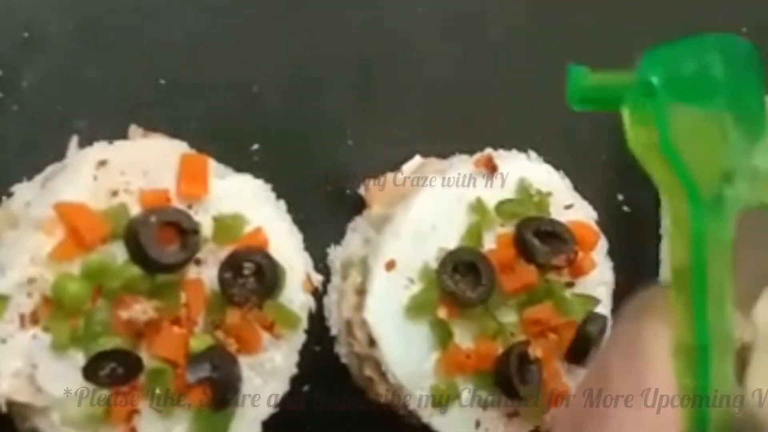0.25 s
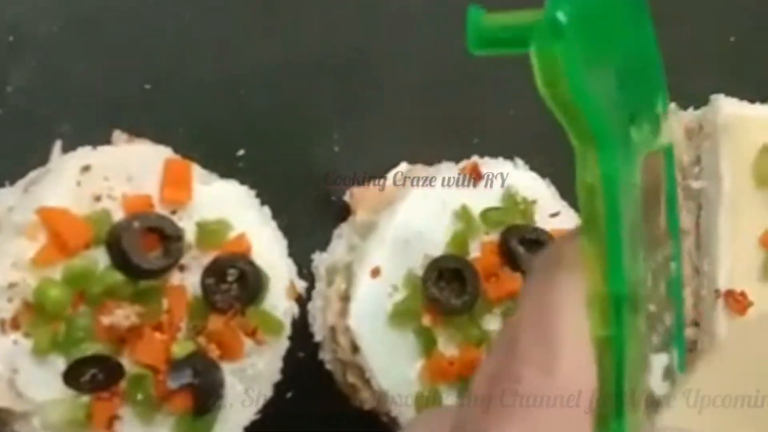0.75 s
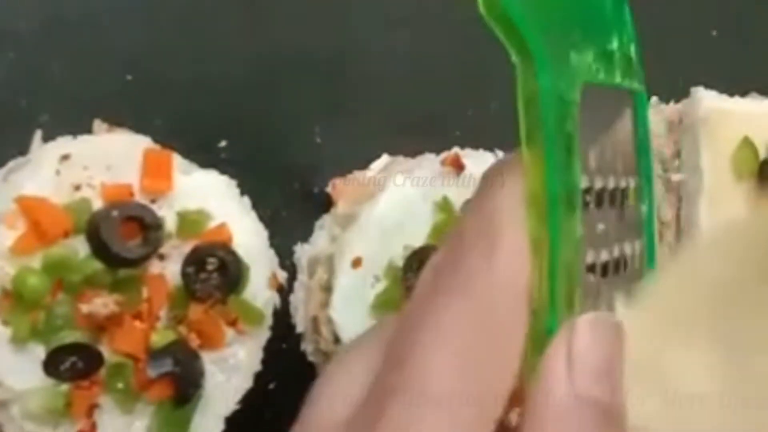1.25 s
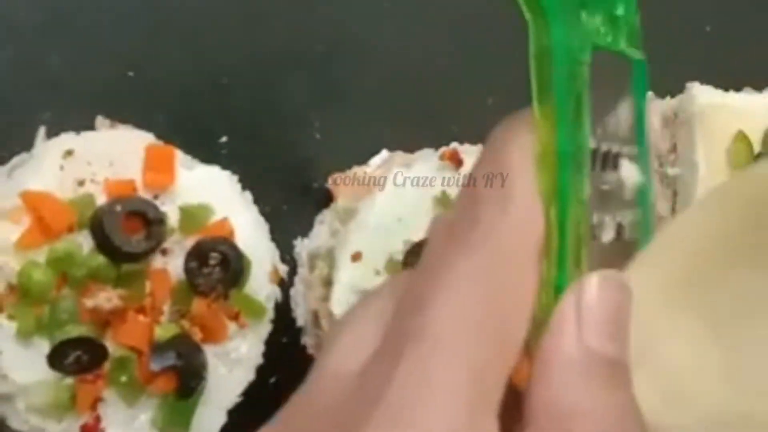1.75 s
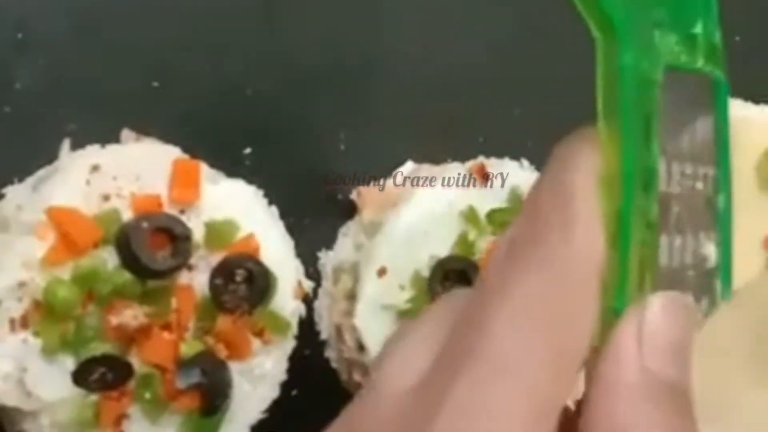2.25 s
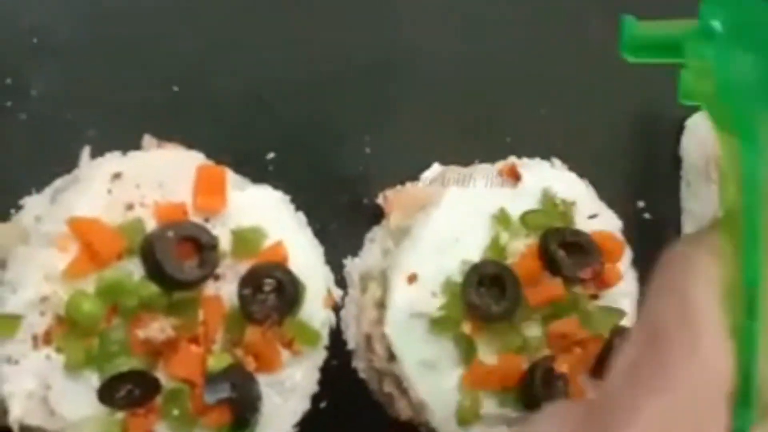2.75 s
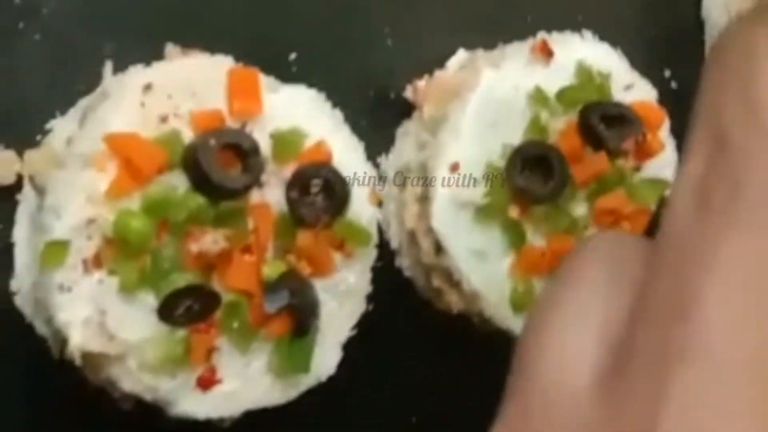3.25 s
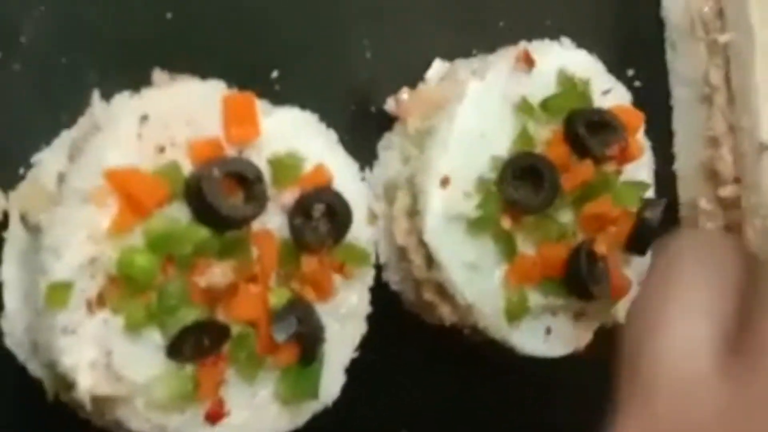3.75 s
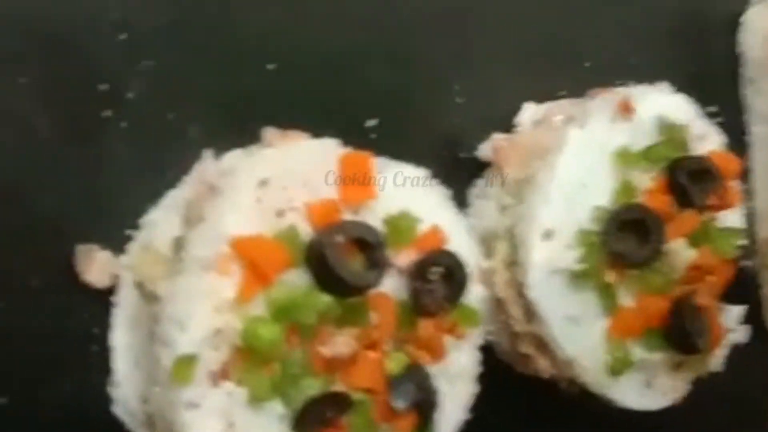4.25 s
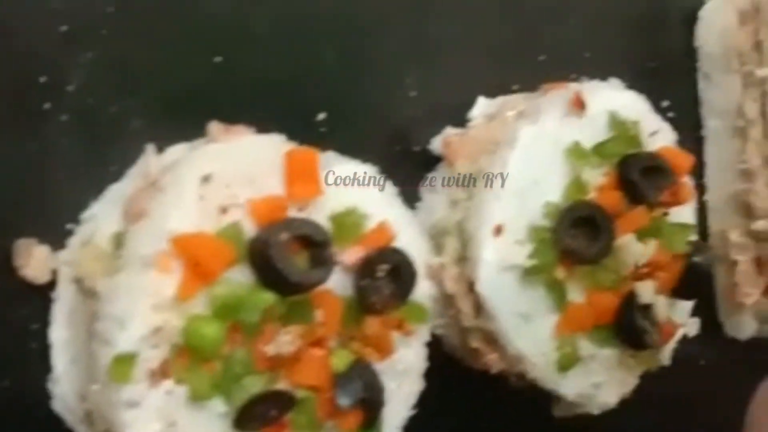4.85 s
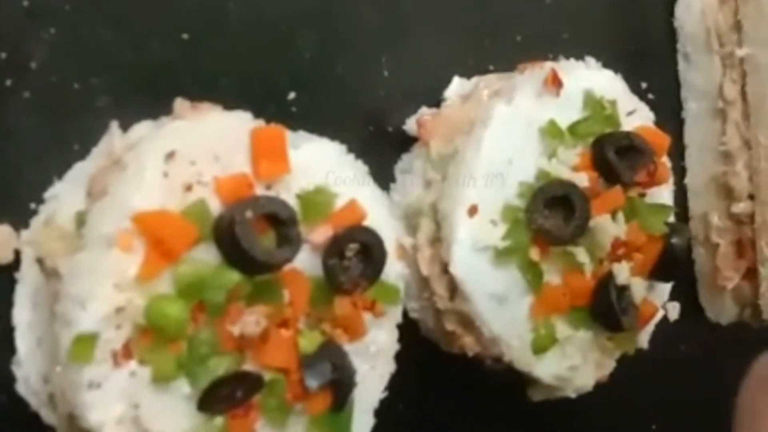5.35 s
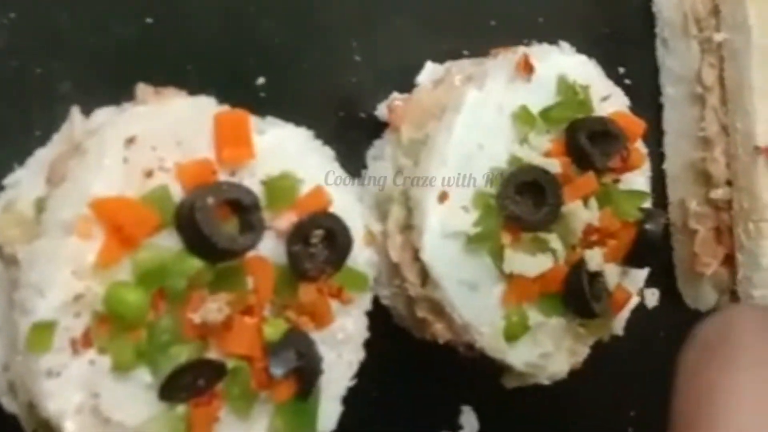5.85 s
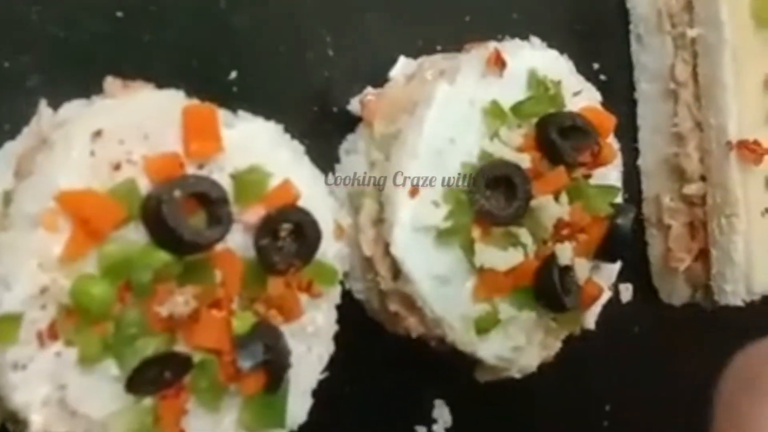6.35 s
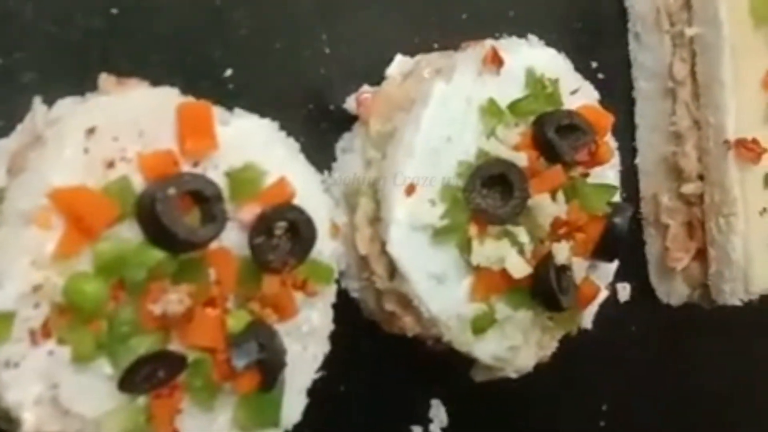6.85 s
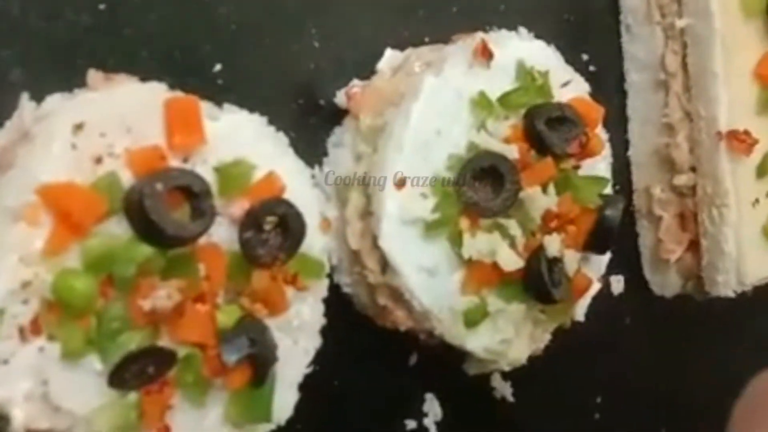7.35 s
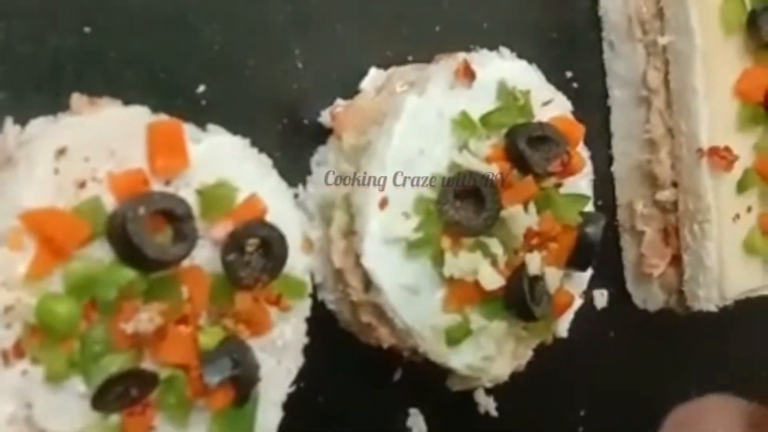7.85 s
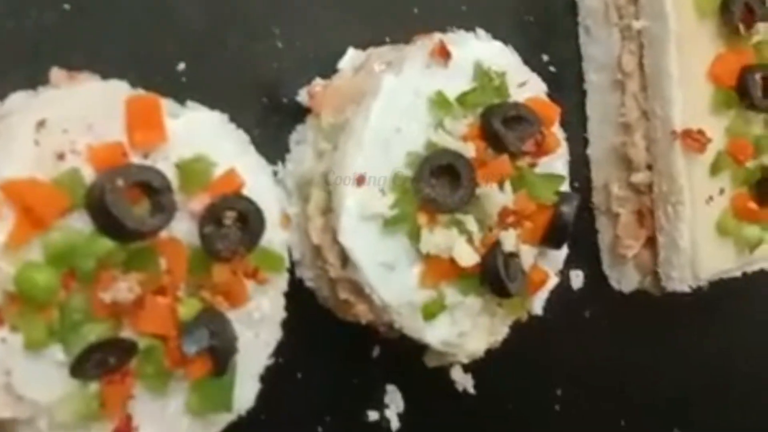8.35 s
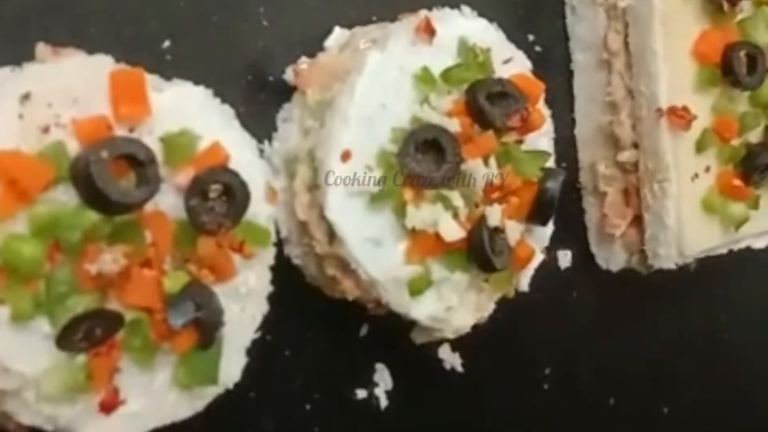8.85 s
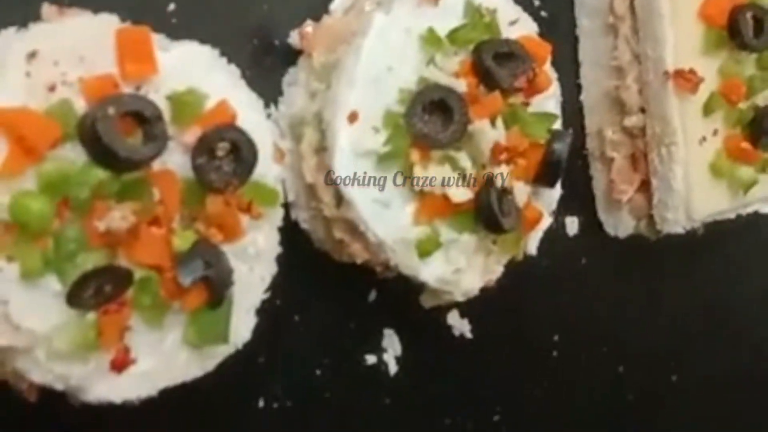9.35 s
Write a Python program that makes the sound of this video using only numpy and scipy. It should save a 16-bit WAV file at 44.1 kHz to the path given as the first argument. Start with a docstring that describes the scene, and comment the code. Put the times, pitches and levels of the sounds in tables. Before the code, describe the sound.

Cheese rasps in short uneven strokes over a plastic-framed hand grater, with sharp clacks and ticks, then stiff wrapping snaps and crackles loudly.

```python
"""In a kitchen, close to the microphone, a block of cheese is pushed in short strokes over a hand-held grater.
The teeth of its steel blade rasp in random grains; where the block catches and slips, gritty pushes ring the
modes of the plastic frame, which clacks, and the room answers briefly with decaying noise. At the end stiff
plastic, probably the cheese wrapper, snaps and crackles. Hands bump softly; two wavering low tones drone
faintly at first."""
import sys
import numpy as np
from scipy import signal
from scipy.fft import rfft, irfft, next_fast_len
from scipy.io import wavfile
from scipy.ndimage import uniform_filter1d, map_coordinates

SR = 44100
rng = np.random.default_rng(int(sys.argv[2]) if len(sys.argv) > 2 else 0)


def to_wav(sig):
    """Store sig (one row per channel, or 1-D mono) as 16-bit WAV at the path in sys.argv[1].

    Samples outside -1..1 are clipped; the rate is SR.
    """
    pcm = np.clip(np.atleast_2d(sig), -1, 1) * 32767
    pcm = np.round(pcm).astype(np.int16)
    wavfile.write(sys.argv[1], SR, pcm.T)  # frames by channels


N = 422919


def amp(db):
    """Decibels to gain."""
    return 10 ** (np.asarray(db) / 20)


def unit(x):
    """Scale to rms 1."""
    return x / np.sqrt(np.mean(x ** 2) + 1e-20)


def along(points, hz):
    """Read a curve of (Hz, value) points on a log frequency axis."""
    point_hz, value = np.transpose(points)
    return np.interp(np.log(hz + 1), np.log(point_hz + 1), value)


def wobble(rate):
    """A smooth random curve with rate knots a second."""
    knots = rng.standard_normal(int(N * rate / SR) + 4)
    return map_coordinates(knots, [np.arange(N) * rate / SR])


def filtered(x, response):
    """Multiply the spectrum of x by a response of frequency."""
    n = x.shape[-1]
    padded = next_fast_len(n + SR // 10)
    spectrum = rfft(x, padded) * response(np.fft.rfftfreq(padded, 1 / SR))
    return irfft(spectrum, padded)[..., :n]


def coloured(x, colour):
    """Filter x by a colour of (Hz, dB) points and scale it to rms 1."""
    return unit(filtered(x, lambda hz: amp(along(colour, hz))))


def add(out, s, x):
    """Mix x into out from time s."""
    start = max(round(s * SR), 0)
    part = out[..., start:start + x.shape[-1]]
    part += x[..., :part.shape[-1]]


def swells(rows, attack, release):
    """Gain of (start s, hold s, dB) gestures that rise before and fall after the hold at rates in dB per second."""
    t = np.arange(N) / SR
    gain = np.zeros(N)
    for start, hold, db in rows:
        below_db = attack * np.maximum(start - t, 0) + release * np.maximum(t - start - hold, 0)
        gain = np.maximum(gain, amp(db - np.minimum(below_db, 100)))
    return gain


def grains(rate, spread_db, life, hiss):
    """Tiny fractures of unequal size, each a short fizz of life seconds, over a smooth rub."""
    sizes = amp(spread_db * np.minimum(rng.standard_exponential(N), 3.5))
    pops = (rng.random(N) < rate / SR) * sizes
    fizz = signal.lfilter([1], [1, -np.exp(-1 / (life * SR))], pops)
    return (unit(fizz) + hiss) * rng.standard_normal(N)


def jolts(times, levels_db, modes, rise, fall, snap, creep_db=-26):
    """Gritty pushes creep, build up and let go (rise, fall in s), ringing resonances of (Hz, width Hz, dB)."""
    size, lead = 2048, 500
    level_span_s = .0075  # a level is the rms of a ring's whole energy spread over this time
    t = (np.arange(size) - lead) / SR
    creep = amp(creep_db) * np.exp(-np.abs(t) / .005) * np.clip(1 - t / t[0], 0, 1)
    envelope = np.exp(-np.where(t < 0, -t / rise, t / fall)) + creep
    push = rng.standard_normal((len(times), size)) * envelope
    push /= np.linalg.norm(push, axis=1, keepdims=True)
    push[:, lead] += snap  # the instant of letting go
    f = np.fft.rfftfreq(size, 1 / SR)
    # each push lands on another spot, so the modes answer at new strengths
    spot_db = 2.0 * rng.standard_normal((len(times), len(modes)))
    body = 0
    for k, (hz, width, db) in enumerate(modes):
        resonance = 1j * f * width / (hz * hz - f * f + 1j * f * width)
        body = body + (-1) ** k * amp(db + spot_db[:, k, None]) * resonance
    # a small part radiates little below its lowest mode and above its highest
    edges = [np.min(modes[0][0]) * .75, min(np.max(modes[-1][0]) * 1.25, SR / 2.1)]
    skirt = signal.freqz(*signal.butter(2, edges, "band", fs=SR), worN=f, fs=SR)[1]
    rings = irfft(rfft(push) * body * skirt)
    rings *= np.sqrt(level_span_s * SR) / np.linalg.norm(rings, axis=1, keepdims=True)
    out = np.zeros(N)
    for s, db, ring in zip(times, levels_db, rings):
        loudest = np.argmax(uniform_filter1d(ring ** 2, size=64))
        add(out, s - loudest / SR, amp(db) * ring)  # the loudest moment falls on the listed time
    return out


# Colour of the room's hush. Each row: frequency in Hz, relative level in dB.
HUSH_COLOUR = [(20, -15), (40, -13), (90, -5), (170, -6.5), (330, -11.5), (650, -20.5), (1200, -17.5),
               (1650, -18.5), (2100, -29.5), (3150, -21), (4150, -32.5), (6550, -26), (8600, -52.5),
               (15500, -51)]


def hush():
    """The quiet room is steady noise, strongest in the bass."""
    return amp(-78.0) * coloured(rng.standard_normal(N), HUSH_COLOUR)


# Tones of the faint drone. Each row: frequency in Hz, relative level in dB.
DRONE_TONES_HZ_DB = [(140, -1.5), (161, -9)]
# it swells to its loudest (s), holds (s) that level (dB), then falls fast
DRONE_PEAK_S, DRONE_HOLD_S, DRONE_DB = .24, 0.082, -54.5
DRONE_SWELL_DB_PER_S, DRONE_RELEASE_DB_PER_S = 29, 651


def drone():
    """Low sines with wavering phase swell faintly and soon stop."""
    t = np.arange(N) / SR
    tones = np.zeros(N)
    for hz, db in DRONE_TONES_HZ_DB:
        tones += amp(db) * np.sin(2 * np.pi * hz * t + 0.74 * wobble(26.4))
    swell = swells([(DRONE_PEAK_S, DRONE_HOLD_S, DRONE_DB)], DRONE_SWELL_DB_PER_S, DRONE_RELEASE_DB_PER_S)
    return swell * unit(tones)


# Shifts of the grip. Each row: start in seconds, hold in seconds, level in dB.
GRIP_SHIFTS = [(.18, 0.15, -64.5), (.7, 0.27, -74.5), (1.47, 0.035, -73), (2.04, 0.033, -72),
               (2.76, 0.18, -64), (2.99, 0.14, -66.5), (3.36, 0.13, -64.5), (3.5, 0.12, -61),
               (3.69, 0.041, -64.5), (3.9, .12, -70.5), (4.25, 0.035, -63), (4.44, 0.035, -67),
               (4.64, 0.034, -70), (4.8, 0.067, -71), (5.13, 0.024, -70.5), (5.37, .03, -74),
               (5.64, 0.036, -72), (6.0, .04, -73), (6.27, 0.037, -67.5), (6.65, 0.73, -77.5),
               (7.46, 0.07, -68.5), (8.28, 0.11, -73), (8.75, 0.22, -71.5), (9.03, 0.19, -63),
               (9.3, 0.23, -69.5)]
SHIFT_ATTACK_DB_PER_S, SHIFT_RELEASE_DB_PER_S = 261.5, 218
# Colour of the handling rumble. Each row: frequency in Hz, relative level in dB.
HANDS_COLOUR = [(20, -27), (40, -8.5), (62, 4), (80, -3), (100, 0), (130, -10.5), (172, -6.5), (230, -14.5),
                (400, -24), (700, -74.5)]


def hands():
    """A hand shifts its grip with a dull rumble, low noise that swells and falls."""
    gain = swells(GRIP_SHIFTS, SHIFT_ATTACK_DB_PER_S, SHIFT_RELEASE_DB_PER_S)
    return gain * coloured(rng.standard_normal(N), HANDS_COLOUR)


# The block slips on the teeth. Each row: time in seconds, pitch of the frame's clack in Hz, force in dB,
# sharpness in dB, knock over the force in dB; each part has a trim of its own below.
BLOCK_SLIPS = [(0.1767, 3030, -28.5, -7.5, -9.5), (0.2729, 3110, -36.5, -12, -13.5),
               (0.321, 3100, -51, 7.5, -9), (0.3552, 3180.0, -52, -17, -6),
               (0.4223, 2970, -46.5, -26, -28.5), (0.4347, 3140, -45.5, -10, -5.5),
               (0.4667, 3220.0, -40, 2.5, -14.5), (0.6552, 3120.0, -48, -4, -26.5),
               (0.6823, 3050, -30, -22, -3.5), (0.7935, 2760, -47, -34, -2), (0.933, 2840, -37, -26, -7.5),
               (1.1323, 2920, -52.5, -22, -34), (1.1576, 3120, -49, -28, -16.5),
               (1.186, 3040, -60, -17, -30), (1.3943, 3340, -57.5, 0, 3.5), (1.4379, 3270, -44.5, 1, -6),
               (1.59, 3150.0, -65, -22.5, -31), (1.689, 3180, -49.5, -5.5, -5.5),
               (1.9177, 3160, -50, 10, -16), (2.0123, 3322, -69, 15.5, -11), (2.1804, 3330, -69.5, 13, 2),
               (2.2153, 3270, -58.5, 8, 7), (2.2368, 3000, -53, 19, 1.5), (2.291, 3073, -41.5, -19, -28),
               (2.575, 2750, -58, -41.5, -16), (2.6588, 3165, -39.5, 4.5, -19),
               (2.7152, 3165, -38, -5, -3.5), (2.7557, 3050, -54, 2, -9), (2.9398, 3090, -45.5, -20, -5.5),
               (2.9832, 3150.0, -54, 3, -10), (2.9991, 3060.0, -38.5, -8, -2.5), (3.0568, 3000, -49, 0, 1),
               (3.1192, 3050, -42.5, -3, -7.5), (3.4013, 2990, -64.5, -20, -8),
               (3.5669, 3140, -33.5, -8, -23), (3.6389, 3160, -41, -21, -8),
               (3.7019, 3005, -43.5, -2.5, 2.5), (3.8715, 3360, -54.5, 5.5, 0),
               (4.0524, 3310, -35.5, -9, -5.5), (4.1, 3250, -33, -4, 0), (4.1308, 3325, -36.5, -5.5, -0.5),
               (4.2588, 3140, -36, -15.5, -6.5), (4.301, 3480, -40.5, -14, -3.5),
               (4.415, 3450.0, -60, 16, -8), (4.4603, 3350, -43.5, -5.5, -4),
               (4.5014, 3190.0, -43.5, 2.5, -12.5), (4.5552, 3400, -40.5, -3, -10.5),
               (4.7082, 3230, -50.5, 3, -23), (4.735, 3250, -54, 16, -28), (4.7686, 3340, -47, 2.5, -3),
               (4.97, 3040, -64, -32, -2), (5.0187, 3340, -46, -5.5, -4), (5.1042, 3354, -33, -16, -5),
               (5.3108, 3410.0, -51.5, -21, -8), (5.3853, 3400, -55, -3, -8), (5.3995, 3260, -48, -18, -10),
               (5.539, 3230.0, -49.5, -40, -11), (5.5548, 3356, -34.5, -7, -3),
               (5.5652, 3280, -40, -1, -21), (5.6324, 3230, -44, -8, -4.5), (5.8265, 2830, -44, -26, -12),
               (5.8727, 3267, -45.5, 2.5, -11), (6.0338, 3125, -67.5, -19, 4),
               (6.1681, 3240.0, -31.5, -5, -25.5), (6.2202, 3040, -39.5, -12.5, -31),
               (6.419, 2940, -54, -6, 1), (6.499, 2830, -55, 0.5, 3), (6.5269, 3240, -45.5, -12, -0.5),
               (6.652, 3150, -50, -40, -4), (6.6699, 3210, -47.5, -5, 5.5), (6.9128, 3315, -33.5, -15, -45),
               (6.9659, 3000, -40.5, -2.5, -18), (7.1014, 3260, -62, -24, 0),
               (7.1745, 3240.0, -48.5, 0, -2.5), (7.322, 3330, -38.5, -7.5, -8),
               (7.4609, 3140, -28, -9.5, -13), (7.7344, 2630.0, -57.5, -37, -28),
               (7.8754, 2970.0, -57, 1, -18), (8.0004, 3070, -51.5, -29.5, -30),
               (8.029, 3090, -38.5, -17, -31), (8.172, 3460, -54.5, 0, -35.5),
               (8.2642, 2964, -27, -19, -24.5), (8.6709, 2980, -23.5, -17.5, -17.5)]
# The frame's modes; where the block presses shifts them together.
# Each row: ratio to the clack pitch, width in Hz, relative level in dB.
FRAME_MODES = [(.78, 269.4, -16), (.89, 264, -5.5), (1.001, 265, 1.5), (1.092, 240, -3)]
# The other resonances that a slip rings: dull knock, steel blade, teeth, and its broad, ringless crack.
# Each row: frequency in Hz, width in Hz, relative level in dB.
KNOCK_MODES = [(1128, 75, -3), (1265.4, 78, 0), (1659, 150, -1), (2050, 120, -14.5)]
BLADE_MODES = [(4630, 570, -8.5), (5310, 690, -0.5), (6160, 800, -0.5), (6970, 650, 0.5), (7940, 1300, -10)]
TEETH_MODES = [(9820, 3400, -5), (12630, 830, 1), (14820, 920, -1.5)]
CRACK_BANDS = [(2030, 1800, -5.5), (4340, 2400, 0)]
# a sharper slip rings the high parts more: the teeth get all of the sharpness, the blade this share
BLADE_SHARE = 0.44


def slips():
    """The block jerks free with a broad crack: the frame clacks, the blade rings and the teeth tick."""
    s, clack_hz, force_db, sharp_db, knock_db = np.transpose(BLOCK_SLIPS)
    frame = [(ratio * clack_hz[:, None], width, db) for ratio, width, db in FRAME_MODES]
    blade_db = force_db + BLADE_SHARE * sharp_db
    clack = jolts(s, force_db, frame, rise=0.0005, fall=.001, snap=0.82, creep_db=-23.5)
    knock = jolts(s, force_db + knock_db, KNOCK_MODES, rise=0.001, fall=0.0012, snap=0.9, creep_db=-22)
    blade = jolts(s, blade_db, BLADE_MODES, rise=0.0005, fall=.0018, snap=0.6, creep_db=-23.5)
    teeth = jolts(s, force_db + sharp_db, TEETH_MODES, rise=0.00025, fall=0.0017, snap=0.3, creep_db=-21.5)
    crack = jolts(s, (force_db + blade_db) / 2, CRACK_BANDS, rise=0.0006, fall=0.0033, snap=0.46)
    return amp(0.5) * clack + amp(-0.67) * knock + blade + amp(1.0) * teeth + amp(-12) * crack


# The grater bumps against the hand and board. Each row: time in seconds, hollow note in Hz, level in dB.
SOFT_BUMPS = [(.177, 749, -57.5), (.681, 516.5, -54), (.682, 780, -52), (.933, 563, -44.5),
              (3.701, 906, -50), (4.099, 850, -51), (4.1, 559, -57), (4.13, 890, -54), (6.168, 790, -62.5),
              (6.22, 803, -61), (6.526, 605, -57), (6.913, 764, -66.5), (6.967, 739, -58),
              (8.811, 575, -50)]
# Hollow of the grater. Each row: frequency in Hz, width in Hz, relative level in dB.
HOLLOW_MODES = [(567, 25, 0), (860, 60, -1.5)]


def bumps():
    """Soft blows ring the hollow of the grater; every slip stirs it a little too."""
    s, _, force_db, _, knock_db = np.transpose(BLOCK_SLIPS)
    stirred = jolts(s, force_db + knock_db, HOLLOW_MODES, rise=0.0016, fall=0.0031, snap=1.0)
    s, note_hz, db = np.transpose(SOFT_BUMPS)
    blows = jolts(s, db, [(note_hz[:, None], 35, 0)], rise=0.0019, fall=0.002, snap=0.9)
    return amp(-23) * stirred + blows


# How long the kitchen rings. Each row: frequency in Hz, time to fall by 60 dB in seconds.
KITCHEN_T60 = [(300, 0.18), (1500, 0.21), (3000, 0.2567), (6000, 0.2514), (14000, 0.23)]
# Strength of its answer. Each row: frequency in Hz, level in dB.
KITCHEN_ECHO = [(300, 1), (1400, -7.5), (2200, -4), (3100, -10.5), (4200, -3.5), (6000, 0.5), (9500, -6.5),
                (14000, -5)]
# Left-right likeness of its answer. Each row: frequency in Hz, likeness from 0 to 1.
KITCHEN_ALIKE = [(3650, 1), (4200, .92), (5500, .84), (7000, .5), (10000, .1), (15000, .5)]


def kitchen_tail(build, bend):
    """One stereo answer of the room: noise builds up, lingers, then each frequency dies ever faster."""
    hz, t, noise = signal.stft(rng.standard_normal((2, SR // 2)), SR, nperseg=256)
    decay = amp(-60 * (t / along(KITCHEN_T60, hz)[:, None]) ** bend) * (1 - np.exp(-t / build))
    decay /= np.sqrt(np.mean(decay ** 2, axis=1, keepdims=True) * SR / 2)
    pair = signal.istft(noise * decay, SR, nperseg=256)[1]

    def mid_side_gains(f):
        # more side and less mid makes left and right less alike
        turn = np.arccos(np.clip(along(KITCHEN_ALIKE, f), 0, 1)) / 2
        return amp(along(KITCHEN_ECHO, f)) * np.array([np.cos(turn), np.sin(turn)])

    mid, side = filtered(pair, mid_side_gains)
    return np.array([mid + side, mid - side])


def kitchen(x):
    """The hands keep moving, so each third of a second of sound gets a new random answer from the room."""
    out, step = np.zeros((2, N)), SR // 3
    for start in range(0, N, step):
        tail = kitchen_tail(build=0.001, bend=1.25)
        add(out, start / SR, signal.fftconvolve(x[None, start:start + step], tail, axes=1))
    return out


# Strokes over the teeth. Each row: start in seconds, end in seconds, rasp in dB before a trim,
# fine treble over the rasp in dB.
GRATING_STROKES = [(0.195, 0.366, -49.5, -7), (0.709, 0.772, -60, 3), (0.806, 0.91, -68, 5),
                   (1.132, 1.2, -62, -1.5), (1.344, 1.46, -60, 3.5), (1.511, 1.589, -77.5, 4.5),
                   (1.76, 1.837, -80, -2), (1.942, 2.071, -71.5, 7.5), (2.112, 2.135, -73, 14),
                   (2.206, 2.313, -54, 4.5), (2.655, 2.759, -53.5, 5.5), (2.903, 3.086, -57.5, -2),
                   (3.301, 3.551, -77.5, -6), (3.557, 3.756, -53, -6.5), (3.844, 4.054, -77, -8.5),
                   (4.073, 4.351, -47.5, -7), (4.417, 4.621, -60.5, 0), (4.722, 4.805, -58.5, 6.5),
                   (4.916, 4.974, -85, 6.5), (5.039, 5.159, -59, 3), (5.298, 5.513, -70.5, -2.5),
                   (5.566, 5.609, -49, -3.5), (5.835, 5.914, -56, -6), (5.994, 6.032, -74.5, 7),
                   (6.157, 6.277, -53, -6), (6.281, 6.335, -57, -32), (6.442, 6.62, -56.5, -15),
                   (6.895, 7.006, -46, -13), (7.012, 7.235, -57.5, -12.5), (8.179, 8.275, -59.5, -26.5),
                   (8.569, 8.671, -75, -25)]
# Colours of the coarse and the fine rasp. Each row: frequency in Hz, relative level in dB.
COARSE_COLOUR = [(150, -27.5), (500, -20), (900, -13), (1230, -15.5), (1700, -9), (2100, -17), (3100, 3),
                 (4100, -13), (5400, -2), (6900, -4.5), (8500, -13), (12000, -19.5)]
FINE_COLOUR = [(3000, -31), (7500, -1), (10000, 0), (13000, 11), (15500, -12.5)]


def rasp():
    """During a stroke the teeth tear shreds off the cheese, in uneven clumps of coarse and fine grains."""
    t = np.arange(N) / SR
    coarse, fine = np.zeros(N), np.zeros(N)
    for start, end, db, fine_db in GRATING_STROKES:
        press = np.clip(np.minimum((t - start) / 0.004, (end - t) / 0.0094), 0, 1)
        coarse += amp(db) * press
        fine += amp(db + fine_db) * press
    clumps = amp(2.1 * wobble(60))
    tearing = coloured(clumps * grains(rate=300, spread_db=4, life=.0022, hiss=.2), COARSE_COLOUR)
    fizzing = coloured(clumps * grains(rate=650, spread_db=3.0, life=.0015, hiss=.25), FINE_COLOUR)
    return amp(-1.5) * coarse * tearing + amp(1.5) * fine * fizzing


# small catches during a stroke: average number a second, level over the stroke (dB), scatter (dB)
CATCHES_PER_S, CATCH_DB, CATCH_SCATTER_DB = 100, -6.5, 2.5
# their clack pitch (Hz) and knock over the force (dB); crisp strokes, with much fine treble,
# knock harder by this share of it
CATCH_HZ, CATCH_KNOCK_DB, CRISP_SHARE = 3270, 1, .6


def catches():
    """Between the big slips single teeth catch at random during the strokes and rattle the frame."""
    start, end, db, fine_db = np.transpose(GRATING_STROKES)
    count = 400  # candidates, thinned below to the wanted rate
    place, when, kept = rng.random((count, 3)).T
    length = np.cumsum(end - start)
    stroke = np.searchsorted(length, place * length[-1])  # longer strokes get more
    s = start[stroke] + when * (end - start)[stroke]
    force_db = db[stroke] + CATCH_DB + CATCH_SCATTER_DB * rng.standard_normal(count)
    force_db = np.where(kept < CATCHES_PER_S * length[-1] / count, force_db, -np.inf)
    frame = [(ratio * CATCH_HZ, width, level) for ratio, width, level in FRAME_MODES]
    knock_db = force_db + CATCH_KNOCK_DB + CRISP_SHARE * fine_db[stroke]
    clack = jolts(s, force_db, frame, rise=.0007, fall=.0012, snap=.7)
    knock = jolts(s, knock_db, KNOCK_MODES, rise=.001, fall=.002, snap=.8)
    return clack + knock


# The wrapper buckles. Each row: time in seconds, force in dB, sharpness in dB, knock over the force in dB;
# each part has a trim of its own below.
WRAPPER_SNAPS = [(8.8103, -37, -5, -28), (8.857, -42.5, -12, 5), (8.896, -38, -8, -27),
                 (8.9188, -23.5, -18.5, -22), (8.9561, -30, -8, -9), (9.01, -29, -23, -9),
                 (9.0461, -25.5, -41, -20), (9.0701, -21.5, -41, -13.5), (9.1464, -38, -31, -3.5),
                 (9.2091, -29, -22, -5.5), (9.222, -29, -11.5, -18), (9.28, -29, -5.5, -9.5),
                 (9.3239, -27.5, -17, -7.5), (9.493, -25, -24.5, -15), (9.5147, -22, -11, -16),
                 (9.5625, -26, -15, -8.5), (9.5719, -15, -29, -17.5)]
# The wrapper's resonances: clack, low knock, high ring.
# Each row: frequency in Hz, width in Hz, relative level in dB.
WRAPPER_CLACK_MODES = [(2570, 760, -11.5), (3195, 500, 5)]
WRAPPER_KNOCK_MODES = [(610, 370, -11.5), (1255, 340, 1.5), (1820, 400, -1.5)]
WRAPPER_RING_MODES = [(5250, 860, 0.5), (7120, 870, -2.5)]


def wrapper_snaps():
    """Stiff film buckles in loud snaps; the sharper ones ring higher parts more."""
    s, force_db, sharp_db, knock_db = np.transpose(WRAPPER_SNAPS)
    ring_db = force_db + 0.76 * sharp_db
    clack = jolts(s, force_db, WRAPPER_CLACK_MODES, rise=0.00089, fall=0.0013, snap=.7)
    knock = jolts(s, force_db + knock_db, WRAPPER_KNOCK_MODES, rise=0.0015, fall=0.0026, snap=.7)
    ring = jolts(s, ring_db, WRAPPER_RING_MODES, rise=0.00089, fall=0.0041, snap=0.8)
    # the grater teeth's bands serve for the film's highest tick
    tick = jolts(s, force_db + sharp_db, TEETH_MODES, rise=0.00079, fall=0.0041, snap=0.16)
    return clack + amp(1.0) * knock + amp(6.5) * ring + amp(-3.0) * tick


# The fingers squeeze the wrapper. Each row: start in seconds, hold in seconds, crackle in dB.
WRAPPER_SQUEEZES = [(8.675, 0.031, -54), (8.92, 0.12, -36), (9.04, 0.027, -31), (9.272, 0.036, -29.5),
                    (9.515, 0.09, -31.5)]
SQUEEZE_ATTACK_DB_PER_S, SQUEEZE_RELEASE_DB_PER_S = 698, 204
# between squeezes the held wrapper goes on rustling
RUSTLE_FROM_S, RUSTLE_DB = 8.675, -45.5
# Colour of the crackle. Each row: frequency in Hz, relative level in dB.
CRACKLE_COLOUR = [(88, -63), (150, -33), (258, -32), (420, -19), (966, -18), (1270, -8.5), (1800, -15.5),
                  (3220, 2), (4060, -21), (5540, -7.5), (7000, -12.5), (8330, -19), (10700, -26.5),
                  (13000, -20.5), (15500, -30)]


def wrapper_crackle():
    """In the squeezed film wide folds crunch low while small creases crackle high."""
    def low_share(hz):
        return 1 / (1 + (hz / 2200) ** 8)

    folds = grains(rate=330, spread_db=3.0, life=0.0035, hiss=0.44)
    folds = filtered(folds, lambda hz: np.sqrt(low_share(hz)))
    creases = grains(rate=680, spread_db=3.0, life=0.0023, hiss=0.27)
    creases = filtered(creases, lambda hz: np.sqrt(1 - low_share(hz)))
    held = np.arange(N) / SR > RUSTLE_FROM_S
    squeeze = swells(WRAPPER_SQUEEZES, SQUEEZE_ATTACK_DB_PER_S, SQUEEZE_RELEASE_DB_PER_S)
    crumple = held * np.hypot(amp(RUSTLE_DB), squeeze)
    return crumple * coloured(folds + creases, CRACKLE_COLOUR)


def scene():
    """Grater and wrapper straight ahead, in the kitchen."""
    near = slips() + bumps() + rasp() + catches() + wrapper_snaps() + wrapper_crackle()
    return near + kitchen(near) + hush() + drone() + hands()


TOP_HZ = 15800


def record(dry):
    """The microphone's response falls very steeply above its band limit."""
    return filtered(dry, lambda f: 1 / np.sqrt(1 + (f / TOP_HZ) ** 160))


dry = scene()
out = record(dry)
to_wav(out)
```